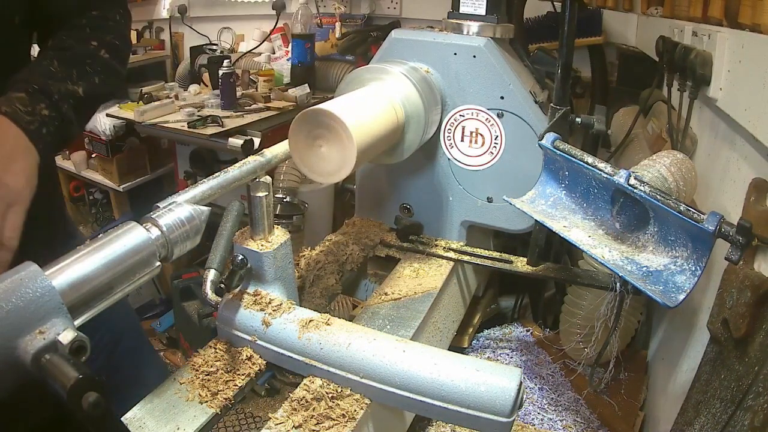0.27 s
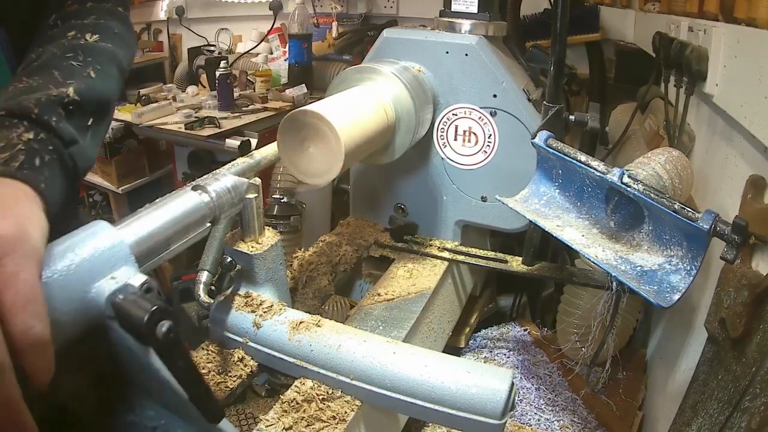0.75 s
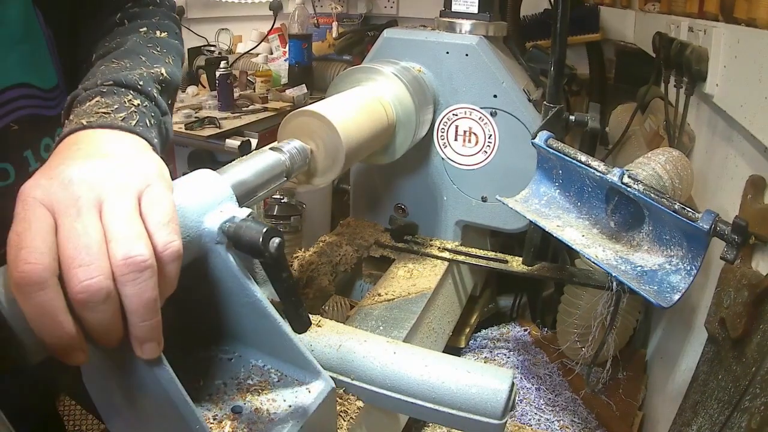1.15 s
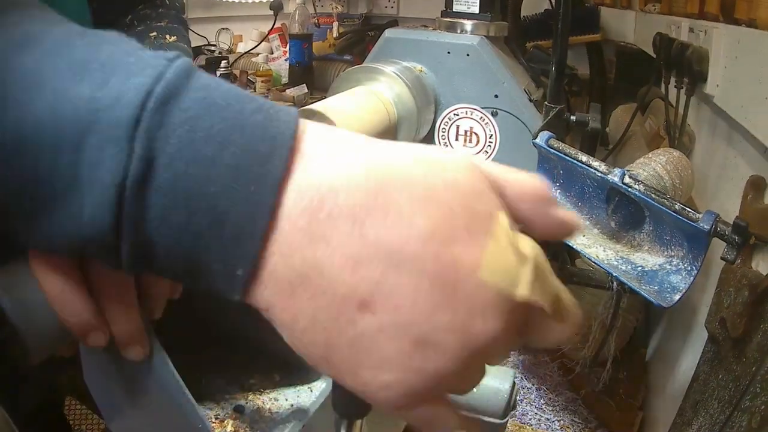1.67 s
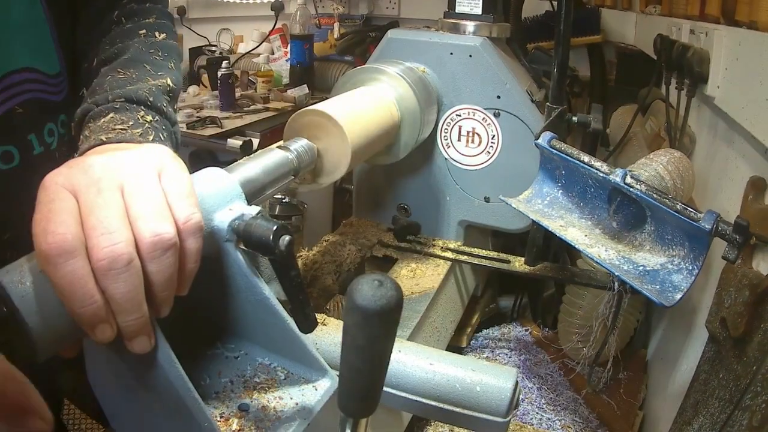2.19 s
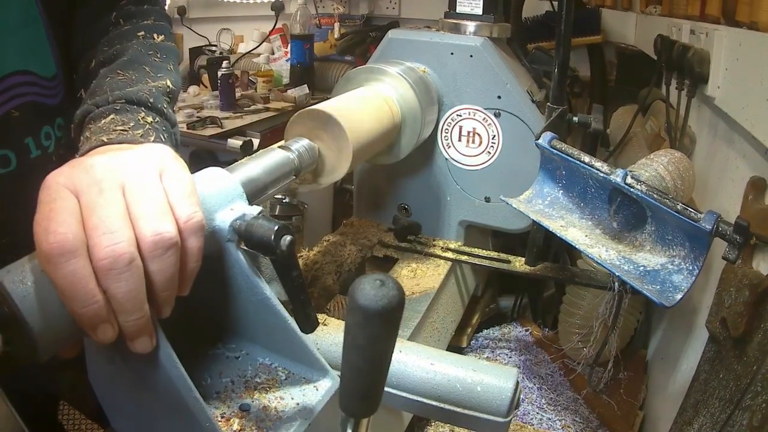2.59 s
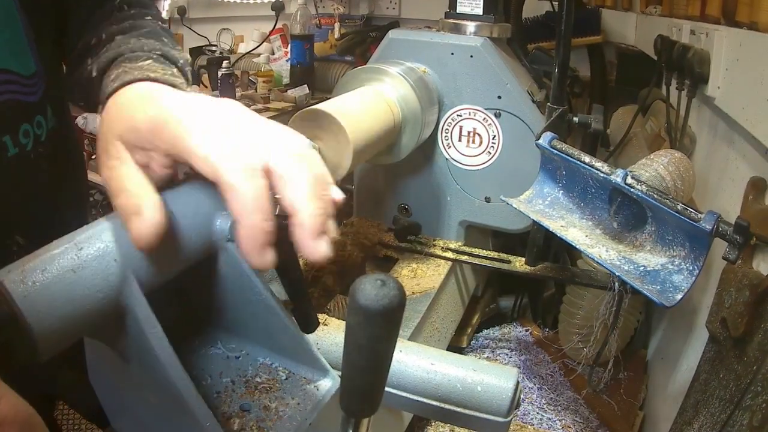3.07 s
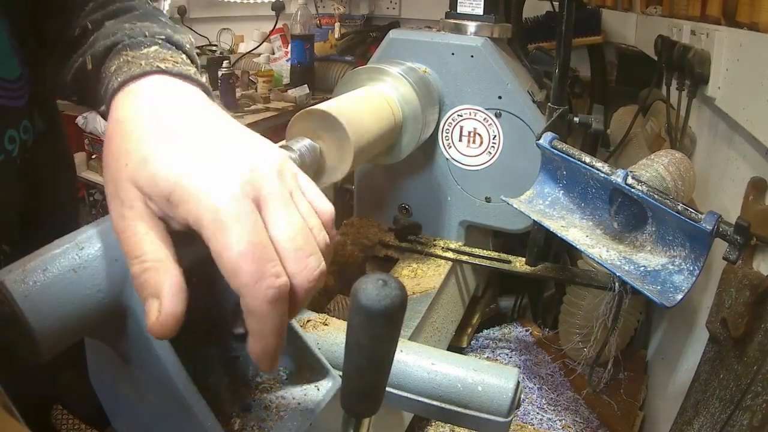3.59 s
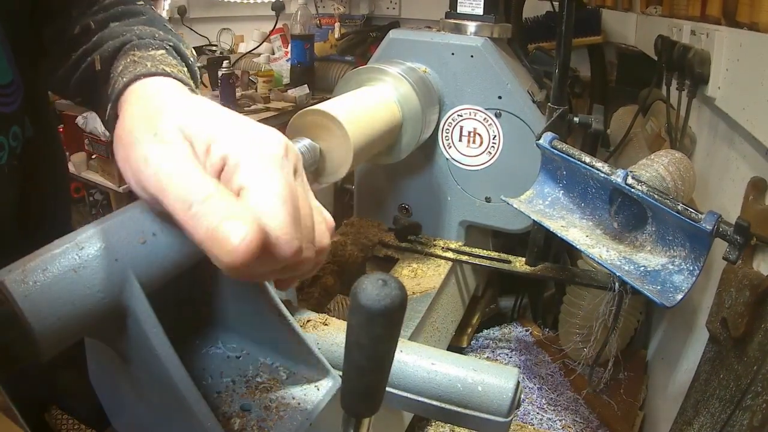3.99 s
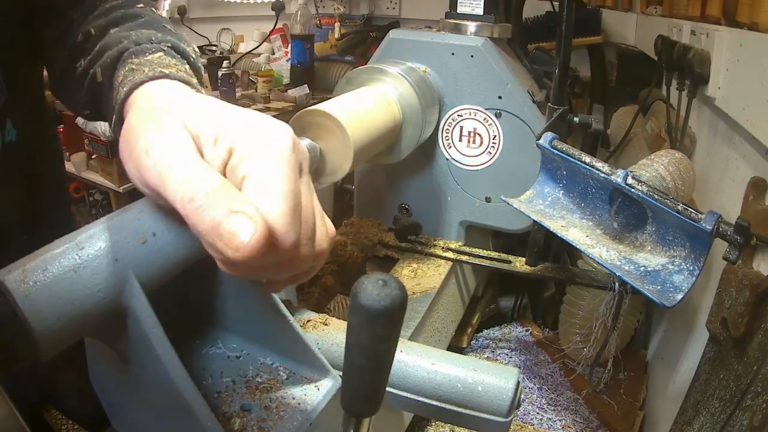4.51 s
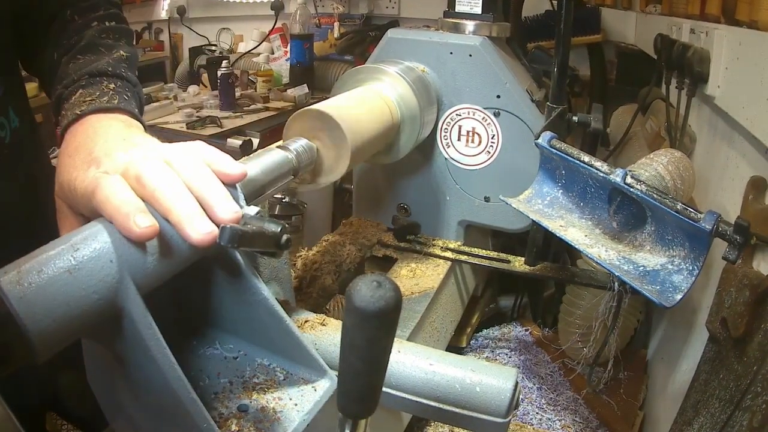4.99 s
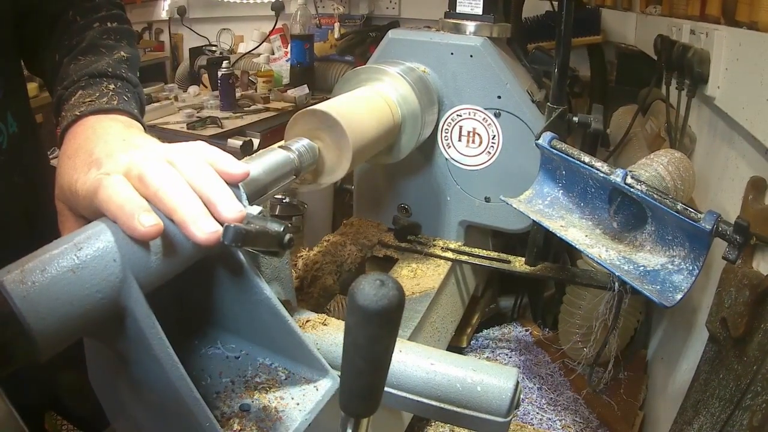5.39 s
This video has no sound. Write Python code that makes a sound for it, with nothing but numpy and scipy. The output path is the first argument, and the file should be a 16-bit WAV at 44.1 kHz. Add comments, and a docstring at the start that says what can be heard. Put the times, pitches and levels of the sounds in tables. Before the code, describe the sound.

In a small cluttered workshop, a running wood lathe hums and whines softly. A small lever clicks, then a heavy tailstock slams with a distorted ringing clunk. Its steel point skims and scrapes the spinning wood, then settles into low pulsing rumble with dull knocks. The rumble stops, leaving hum, until a double knock and renewed rumble. Close mono microphone, shaken by the machine, dull treble.

```python
"""A wood lathe hums and whines at about 52 turns a second, heard from a microphone that shakes with the machine.
A lever clicks, its metal ringing; the tailstock slides home with an overloading clunk of ringing lathe modes.
Its centre skims the spinning blank, then scrapes it: noise that partly repeats each turn drives resonances.
Then the centre turns with the wood: it rumbles and rocks the lathe in tones tied to the turning, with short
spells of knocks, one a turn. It is eased off, small ticks sound, and it is pressed in again."""
import sys
import numpy as np
from scipy import signal
from scipy.fft import rfft, irfft
from scipy.io import wavfile
from scipy.ndimage import map_coordinates

SR = 44100
rng = np.random.default_rng(int(sys.argv[2]) if len(sys.argv) > 2 else 0)


def file_out(sig):
    """Save sig as 16-bit WAV at sys.argv[1]."""
    # one column per channel
    cols = np.atleast_2d(sig).T
    # limit, then scale
    lim = np.clip(cols, -1, 1)
    pcm = np.round(lim * 32767).astype(np.int16)
    wavfile.write(sys.argv[1], SR, pcm)


N = 249095

# Speed of the spindle. Each row: time in seconds, turns per second.
SPEED = [(1.49, 52.1), (1.6, 53.8), (1.72, 49), (1.91, 52.4), (3.0, 51.8), (5.6, 52.5)]
# The point skims the wood. Each row: time in seconds, relative level in dB.
SKIM = [(.675, -39.5), (.84, -36.5), (1.05, -33)]
# The point digs in and slips. Each row: time in seconds, relative level in dB.
SCRAPE = [(1.054, -28.5), (1.075, -22.5), (1.25, -20), (1.36, -20.5), (1.463, -22), (1.48, -43)]
# Tone colour of a knock. Each row: frequency in Hz, relative level in dB.
KNOCK_COLOUR = [(150, -6.5), (500, -0.5), (950, -1.5), (1350, 3), (1650, -10), (2100, -7), (2800, -17.5),
                (3300, -13), (3600, -21.5), (3900, -11.5), (4600, -33.5), (5800, -45), (10000, -55.5)]
# Tone colour of light metal contacts. Each row: frequency in Hz, relative level in dB.
TICK_COLOUR = [(700, -8.5), (2200, -1), (3300, 7), (5400, -3.5), (6400, -14.5), (7900, -6), (10000, -17)]


def amp(db):
    """Turns decibels into gain."""
    return 10 ** (np.asarray(db) / 20)


def unit(x):
    """Scales a sound to an rms (average strength) of 1."""
    return x / np.sqrt(np.mean(x ** 2) + 1e-20)


def clock():
    """Gives the time of every sample in seconds."""
    return np.arange(N) / SR


def level(rows, fade=0.02):
    """Follows a curve of seconds and dB as a gain, dying away outside its span."""
    s, db = np.transpose(rows)
    outside = np.maximum(s[0] - clock(), 0) + np.maximum(clock() - s[-1], 0)
    return amp(np.interp(clock(), s, db)) * np.exp(-outside / fade)


def held(start, end, rise_s, fall_s):
    """Swells up to start, holds until end, then dies away."""
    early = np.maximum(start - clock(), 0)
    late = np.maximum(clock() - end, 0)
    return np.exp(-early / rise_s - late / fall_s)


def drift(rate_hz):
    """Wanders at random with rms 1, mostly slower than the given rate."""
    hz = np.fft.rfftfreq(N, 1 / SR)
    return unit(irfft(rfft(rng.standard_normal(N)) / (1 + (hz / rate_hz) ** 4), N))


def coloured(x, points, size=8192):
    """Filters a sound to an outline of Hz and dB, with no sound ahead of its cause."""
    f, db = np.transpose(points)
    hz = abs(np.fft.fftfreq(size, 1 / SR))
    outline_db = np.interp(np.log(hz + 1), np.log(f + 1), db)
    log_gain = np.log(amp(np.maximum(outline_db, -100)))
    # this phase puts the response as early as it can be
    taps = np.fft.ifft(np.exp(signal.hilbert(log_gain).conj())).real
    return signal.oaconvolve(x, taps[:size // 2])[:len(x)]


def resonant(x, peaks):
    """Rings a bank of resonances with steep skirts, scaled to rms 1."""
    out = 0
    for hz, width, db in peaks:
        b, a = signal.iirpeak(hz, hz / (2 * width), fs=SR)
        once = signal.lfilter(b, a, x)
        out = out + amp(db) * signal.lfilter(b, a, once)
    return unit(out)


def add(mix, s, sound):
    """Lays a sound into the mix at time s."""
    part = mix[round(s * SR):][:len(sound)]
    part += sound[:len(part)]


def burst(colour, t60, size=12000):
    """Makes a sudden patch of dense modes that falls by 60 dB in t60 seconds."""
    noise = rng.standard_normal(size)
    dying = np.exp(-np.log(1000) * np.arange(size) / SR / t60)
    return coloured(noise * dying, colour) / np.std(coloured(noise, colour))


def wavering(x):
    """Lets the pitch of a ringing sound wander, as shifting contact does, by a varying delay."""
    wander_s = 0.00038  # rms delay
    return map_coordinates(x, [np.arange(N) + wander_s * SR * drift(7.9)], order=3, mode="nearest")


def friction(turns, repeat, throb_db, size=848):
    """Rubs a spinning surface: its bumps come round each turn, and it presses harder on its high side."""
    bumps = rng.standard_normal(size)[(turns % 1 * size).astype(int)]
    repeat = np.clip(repeat, 0, 1)  # share of the power that repeats each turn
    rub = np.sqrt(repeat) * bumps + np.sqrt(1 - repeat) * rng.standard_normal(N)
    return unit(rub * amp(throb_db * np.cos(2 * np.pi * turns)))


def tone(turns, waver):
    """Sounds one steady note, one cycle a turn, whose size and phase waver."""
    size, phase = drift(12), drift(12)
    wave = ((1 + waver * (size + 1j * phase)) * np.exp(2j * np.pi * turns)).real
    return np.sqrt(2) * wave / np.sqrt(1 + 2 * waver ** 2)


def centre(turns, rumble_gain, grit_gain):
    """The steel point skims, scrapes, then rolls with the wood; uneven grain makes it all lumpy."""
    # Squeal at first touch. Each row: time in seconds, relative level in dB.
    groan = [(.69, -48.5), (.73, -34), (.8, -28.5)]
    # The shaking quill rubs in its bore as it is wound forward. Each row: time in seconds, relative level in dB.
    quill_level = [(4.8, -56.5), (4.935, -51), (5.04, -50)]
    # Resonances of the skim, squeal, seated point and quill.
    # Each row: frequency in Hz, width setting in Hz, relative level in dB.
    skim_ring = [(826, 90, -2), (1170, 97, 1), (1917, 45, 1), (3470, 300, -12.5)]
    groan_ring = [(832, 26, 6), (1940, 45, -2.5), (3530, 210, -11)]
    seat_ring = [(576, 34, 7.5), (875, 61, 5.5), (3160, 190, -9.5)]
    quill_ring = [(3400, 450, -4.5), (3810, 230, -1.5)]
    # Tone colours of the rumble and the grit. Each row: frequency in Hz, relative level in dB.
    rumble_colour = [(25, 4), (75, 6), (125, 0.5), (400, -3), (500, -10), (590, -6.5), (870, -11),
                     (1100, -57.5)]
    grit_colour = [(600, -14), (880, 1), (1350, 4), (1650, -7.5), (2200, -8.5), (2700, -14.5), (3130, -14),
                   (3950, -19.5), (5000, -41.5)]
    lumps_db = 2.1  # how far uneven grain makes the rumble swell and sink

    touch = friction(turns, repeat=0.1465, throb_db=0.0) * amp(1.9 * drift(28))
    skim = level(SKIM) * resonant(touch, skim_ring)
    squeal = level(groan) * wavering(resonant(touch, groan_ring))

    lumpy = friction(turns, repeat=0.37, throb_db=8.5) * amp(lumps_db * drift(28))
    rumble = amp(3.5) * unit(coloured(lumpy, rumble_colour))

    crackle = amp(2 * drift(150))
    gritty = friction(turns, repeat=0.29, throb_db=3.0) * crackle
    grit = amp(2.0) * unit(coloured(gritty, grit_colour))

    singing = wavering(resonant(friction(turns, repeat=0.27, throb_db=4.0), seat_ring))
    seat = amp(4.0) * singing * amp(lumps_db * drift(17))
    quill_rub = friction(turns, repeat=.15, throb_db=7.5) * crackle
    quill = level(quill_level) * resonant(quill_rub, quill_ring)
    return skim + squeal + scrape(turns) + rumble_gain * rumble + grit_gain * (grit + seat) + quill


def scrape(turns):
    """The point tears at the wood all the way round, and snatches once a turn with varying strength."""
    # Tone colour of the tearing. Each row: frequency in Hz, relative level in dB.
    tear_colour = [(150, -6), (240, -10.5), (420, -6.5), (840, -6), (1200, -6.5), (1600, -16.5),
                   (3500, -22), (5600, -66), (7700, -59.5)]
    # Resonances of the snatches, and of the point singing as it slips between them.
    # Each row: frequency in Hz, width setting in Hz, relative level in dB.
    snatch_ring = [(1127, 41, -5.5), (1840, 77, 2.5), (2410, 180, 1), (3167, 170, 7), (3350, 85, 5.5),
                   (3870, 140, 2), (4900, 66, -12.5), (7500, 250, -26.5)]
    chatter_ring = [(790, 80, 0)]
    snatch_at, snatch_turns = .8, 0.3  # place in each turn and how long it holds, in turns

    torn = friction(turns, repeat=0.35, throb_db=1.5) * amp(2.3 * drift(410))
    tearing = amp(0.5) * unit(coloured(torn, tear_colour))
    slipping = friction(turns + 1 / 2, repeat=0.17, throb_db=9.5)
    chatter = amp(-4.5) * wavering(resonant(slipping, chatter_ring))

    turn, part = np.divmod(turns - snatch_at, 1)
    strength = amp(1.9 * rng.standard_normal(N)[turn.astype(int)])  # one draw for each turn
    snatch = strength * (np.exp(-(part / snatch_turns) ** 2) + amp(-14.5))
    ringing = amp(-4.0) * resonant(snatch * rng.standard_normal(N), snatch_ring)
    return level(SCRAPE, fade=.008) * (tearing + chatter + ringing)


def contact():
    """Pressure on the blank sets the strength of rocking, throb, drone, rumble and grit."""
    # The centre is wound into the blank. Each row: start in seconds, end in seconds, time to seat in seconds,
    # then relative levels in dB of rocking, rumble, grit and twice-a-turn throb.
    presses = [(1.453, 3.159, 0.86, -15.5, -34.5, -45.5, -30.5), (4.896, 5.7, 0.32, -14, -35, -49.5, -42.5)]
    # The point catches in the grain and grinds.
    # Each row: time in seconds, swell time in seconds, rumble in relative dB, grit in relative dB.
    catches = [(1.659, 0.093, -34.5, -50.5), (2.4, 0.14, -46, -45.5), (2.639, 0.046, -39.5, -47.5),
               (3.121, 0.06, -37.5, -59), (5.031, 0.056, -28, -50.5)]
    # The blank lurches as the point meets it. Each row: time in seconds, relative level in dB.
    lurches = [(.805, -27), (1.489, -11), (1.653, -13)]
    # Slight rocking between the presses. Each row: time in seconds, relative level in dB.
    resting = [(3.52, -51), (3.68, -43.5), (4.9, -39.5)]
    # friction starts and stops quickly; the vibration takes longer to die
    grip_s, release_s, coast_s = 0.064, 0.015, 0.029
    # both grow as these powers of how far the centre has seated
    rocking_onset, throb_onset = 1.13, 6.6
    # once seated, rising pressure steadies the blank, smooths the grit and makes the casting drone
    steady_db_per_s, smooth_db_per_s, drone_db_per_s = 11, 4, 23

    rumble = sum(amp(db) * held(s, s, swell_s, swell_s) for s, swell_s, db, _ in catches)
    grit = sum(amp(db) * held(s, s, swell_s, swell_s) for s, swell_s, _, db in catches)
    lurch = sum(amp(db) * held(s, s, rise_s=0.028, fall_s=0.032) for s, db in lurches)
    # skimming, scraping and catching also drive the vibration
    rocking = lurch + level(resting) + amp(1) * level(SKIM) + amp(-0.5) * level(SCRAPE)
    drone = amp(-0.5) * rumble + amp(-7) * level(SCRAPE)
    throb = amp(10.5) * rumble
    for start, end, seat_s, rocking_db, rumble_db, grit_db, throb_db in presses:
        since = np.clip(clock(), start, end) - start
        seated = np.minimum(since / seat_s, 1)
        tightened_s = np.maximum(since - seat_s, 0)
        rubbing = held(start, end, grip_s, release_s)
        swinging = held(start, end, grip_s, coast_s)
        steadied = amp(rocking_db - steady_db_per_s * tightened_s)
        rocking = rocking + swinging * seated ** rocking_onset * steadied
        throb = throb + swinging * seated ** throb_onset * amp(throb_db)
        drone = drone + swinging * amp(-38.5 + drone_db_per_s * tightened_s)
        rumble = rumble + rubbing * amp(rumble_db)
        grit = grit + rubbing * amp(grit_db - smooth_db_per_s * tightened_s)
    return rocking, throb, drone, rumble, grit


def shake(turns, rocking_gain, throb_gain, drone_gain):
    """The off-centre blank rocks the lathe once a turn; the casting drones, mostly at six times that rate."""
    # Overtones of the rocking. Each row: multiple of the turning rate, level in dB against the once-a-turn tone.
    multiples = [(3, -22), (5, -23.5), (8, -33)]
    overtones = sum(amp(db) * tone(k * turns + rng.random(), waver=0.36) for k, db in multiples)
    rocking = rocking_gain * (tone(turns + 1 / 2, waver=.08) + overtones)
    second, third, fifth, sixth = (tone(k * turns + rng.random(), waver=.2) for k in (2, 3, 5, 6))
    throb = amp(-4.0) * second * throb_gain
    drone = (amp(0.5) * sixth + amp(-16.5) * fifth + amp(-13.0) * third) * drone_gain
    return rocking + throb + drone


def strike(force_db, thud_db, treble_db, ring_share):
    """A knock rings the lathe: heavy blows reach the low modes, hard ones the high modes and a bright clatter."""
    # Notes the lathe rings with. Each row: frequency in Hz, relative level in dB,
    # time to fall 60 dB in seconds when undamped.
    casting = [(46, -8.5, 0.4), (85.5, -1, 0.12), (129.2, -3, 0.12), (184, -0.5, .065), (262.3, 1.5, .065),
               (289.4, 1.5, .07), (316.8, 0, 0.27), (475, -3.5, .04), (553, -6.5, 0.11), (855, -3.5, 0.064),
               (3322, -3, 0.009), (7410, -32.5, 0.26)]
    body_lag_s = 0.0016  # the mass of the casting moves just after the first contact
    t = np.arange(SR // 2) / SR
    out = np.zeros(len(t))
    for k, (hz, db, t60) in enumerate(casting):
        colour_db = np.interp(np.log(hz), np.log([250, 380, 3000]), [thud_db, 0, treble_db])
        dying = np.exp(-np.log(1000) * t / (t60 * ring_share))
        ring = dying * np.sin(2 * np.pi * hz * t)
        # neighbouring modes swing opposite ways
        add(out, body_lag_s, (-1) ** k * amp(db + colour_db) * ring)
    add(out, 0, amp(-5.5) * burst(KNOCK_COLOUR, t60=0.02))
    add(out, 0, amp(treble_db - 14) * burst(TICK_COLOUR, t60=0.061))
    return amp(force_db) * out


def blows():
    """The tailstock slams home and later its centre knocks the blank; each contact chokes the earlier ring."""
    # Blows of the tailstock and centre. Each row: time in seconds, force in relative dB, low thud in relative dB,
    # treble in relative dB, share of the ring time left undamped.
    hits = [(0.5157, -2.5, 6, 15, 0.71), (0.5236, 5.5, 8.5, 0, 0.85), (0.5342, 5, 2, -2, 1),
            (0.5498, 3, 5, 2, 1), (0.5702, -1.5, -3.5, -10.5, 0.7), (1.622, -15, 6, -16, 0.38),
            (1.665, -13, -21, -21, 1), (1.699, -25, -17, -11.5, 0.9), (1.837, -20.5, -8.5, -23, 0.99),
            (4.7345, -19, 2.5, -23, 0.69), (4.7525, -15.5, 1.5, -23.5, 0.64)]
    choke_s = 0.0059  # how quickly a new contact stops an earlier ring
    out = np.zeros(N)
    for s, *blow in hits:
        out = out * np.exp(-np.maximum(clock() - s, 0) / choke_s)
        add(out, s, strike(*blow))
    return out


def rattles():
    """The point knocks dully in its seat, once a turn, each knock partly sharing one ring; fittings tick lightly."""
    # Spells of knocking. Each row: start in seconds, length in seconds, first knock in relative dB,
    # change in dB per second.
    spells = [(2.422, .03, -13, -200), (2.6453, .05, -12.5, 2.5), (2.7585, .01, -17, 1), (2.8, .01, -20, 0),
              (2.9165, .07, -14.5, -130), (2.992, .05, -16, 61), (3.051, .11, -10, -90.5)]
    # Light metal ticks. Each row: time in seconds, relative level in dB, brightness in relative dB,
    # tinkle in relative dB.
    ticks = [(0.312, -40.5, 0, -14), (0.3682, -33, 3.5, -31), (0.393, -37.5, -2.5, -19),
             (0.5971, -18, -20.5, -14), (4.3956, -39.5, -10, -17), (5.06, -41.5, 2, -6),
             (5.357, -37, -3, -4), (5.412, -38, 2.5, -3.5), (5.52, -40.5, 16, -26.5)]
    out = np.zeros(N)
    seat = burst(KNOCK_COLOUR, t60=0.03)  # the shared part of every knock
    for s, length, db, db_per_s in spells:
        turn_s = 1 / np.interp(s, *np.transpose(SPEED))
        for after in np.arange(0, length, turn_s):
            knock = 0.31 * seat + 0.31 * burst(KNOCK_COLOUR, t60=0.031)
            add(out, s + after, amp(db + db_per_s * after) * knock)
    for s, db, bright_db, tinkle_db in ticks:
        add(out, s, amp(db) * tick(bright_db, tinkle_db))
    return out


def tick(bright_db, tinkle_db):
    """A small fitting gives a splash of dense modes and two tinkling ones."""
    # Notes of the tinkle. Each row: frequency in Hz, width setting in Hz, relative level in dB.
    tinkle_ring = [(3040, 170, 0), (5750, 280, 3)]
    splash = coloured(burst(TICK_COLOUR, t60=0.04), [(3500, 0.0049), (8000, bright_db)])
    tinkle = resonant(splash, tinkle_ring) * np.std(splash)
    return amp(-3) * splash + amp(tinkle_db) * tinkle


def lever():
    """The small steel locking lever snaps over and settles: a short ring with a bright click."""
    # Hits of the lever. Each row: time in seconds, relative level in dB.
    hits = [(0.2287, -15), (.2318, -11), (0.2395, -21.5)]
    # Notes it rings with. Each row: frequency in Hz, relative level in dB, time to fall 60 dB in seconds.
    modes = [(311, -8, .15), (422, 2, 0.16), (593, -7.5, 0.11), (870, 0, 0.043), (2125, -7, 0.04),
             (3760, -8.5, 0.043), (4740, -14, 0.039)]
    t = np.arange(SR // 3) / SR
    ring = np.zeros(len(t))
    for k, (hz, db, t60) in enumerate(modes):
        ring += (-1) ** k * amp(db - 60 * t / t60) * np.sin(2 * np.pi * hz * t)
    out = np.zeros(N)
    for s, db in hits:
        add(out, s, amp(db) * ring)
        add(out, s, amp(db - 9) * burst(TICK_COLOUR, t60=0.034))
    return out


def steady_tones(lines, t):
    """Adds up plain tones, each starting at a random point of its cycle."""
    return sum(np.sqrt(2) * amp(db) * np.cos(2 * np.pi * (hz * t + rng.random())) for hz, db in lines)


def idle(turns):
    """The motor and belt hum, the free spindle whines, bearings sing and air rushes round the blank."""
    # Motor and belt tones, then tones of the free spindle. Each row: frequency in Hz, relative level in dB.
    hum_lines = [(208.3, -48), (323, -51.5), (414.8, -42.5), (593, -54), (646, -49.5)]
    whine_lines = [(139, -47), (276.5, -39), (415.7, -42.5), (554, -47), (830, -54)]
    # Bearing resonance. Each row: frequency in Hz, width setting in Hz, relative level in dB.
    bearing_ring = [(1932, 80, 0)]
    # Tone colour of the air. Each row: frequency in Hz, relative level in dB.
    air_colour = [(25, -3.5), (90, -3), (260, -9.5), (390, -6), (510, -13.5), (830, -13.5), (1050, -26.5),
                  (1600, -31.5), (3400, -31.5), (8500, -48.5)]
    t = clock() + 0.000073 * drift(4.7)  # the pitch wanders slightly
    hum = steady_tones(hum_lines, t)
    whine = steady_tones(whine_lines, t)
    free = np.interp(clock(), [.85, 1.1], [1, 0])  # the spindle runs free until the point bites
    bearings = amp(-61.5) * resonant(friction(turns, repeat=0.7, throb_db=6.0), bearing_ring)
    air = amp(-39.5) * unit(coloured(friction(turns, repeat=0.4, throb_db=0.7), air_colour))
    return amp(-7 * free) * hum + free * whine + bearings + air  # the hum is softer while free


def workshop(x):
    """A small cluttered room returns a short, dull tail of dying noise."""
    tail = burst([(150, -12.5), (400, 5.5), (3000, -10.5), (9000, -36.0)], t60=0.21)
    tail[:SR // 200] = 0  # nothing comes back in the first 5 ms
    return x + amp(-24.0) * signal.oaconvolve(x, tail / np.linalg.norm(tail))[:N]


def scene():
    """Everything is laid over the turning spindle; both channels hear the same."""
    turns = np.cumsum(np.interp(clock(), *np.transpose(SPEED))) / SR
    turns = turns - np.interp(1.325, clock(), turns)  # the high side meets the point at this moment
    rocking, throb, drone, rumble, grit = contact()
    in_room = workshop(centre(turns, rumble, grit) + lever() + blows() + rattles())
    mono = idle(turns) + shake(turns, rocking, throb, drone) + in_room
    return np.array([mono, mono])


def record(dry):
    """The microphone input overloads, the treble rolls off, and the output is held to full scale."""
    # Tone colour of the microphone. Each row: frequency in Hz, relative level in dB.
    microphone = [(10, 1), (8300, -1.5), (9300, -17), (15000, -19.5)]
    overloaded = np.clip(dry, -.97, .97)
    dulled = np.array([coloured(channel, microphone) for channel in overloaded])
    edge_hz = 15700  # little passes above this
    lowpass = signal.firwin(255, edge_hz, window=("kaiser", 9), fs=SR)
    return signal.oaconvolve(np.clip(dulled, -1, 1), lowpass[None], "same")


dry = scene()
out = record(dry)
file_out(out)
```